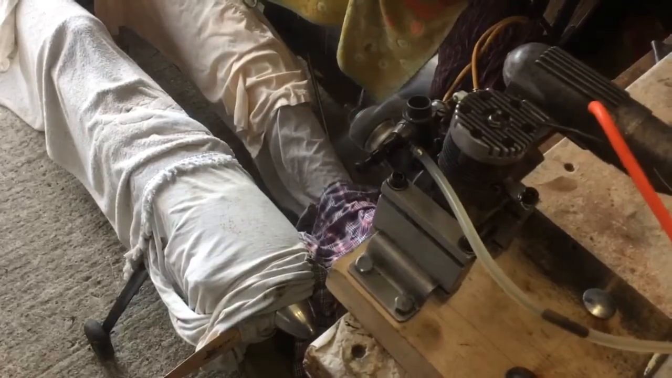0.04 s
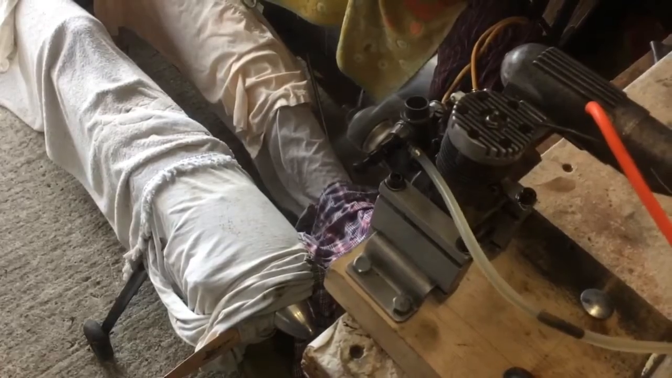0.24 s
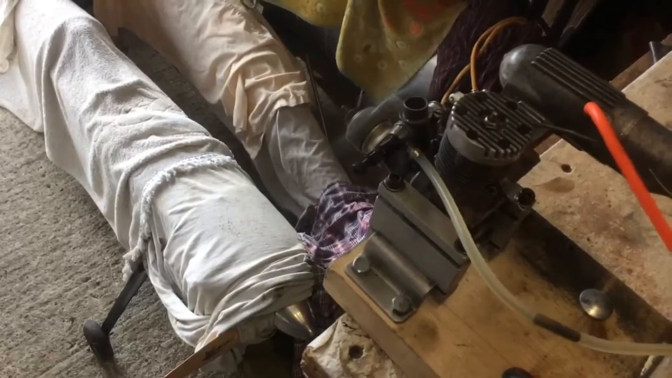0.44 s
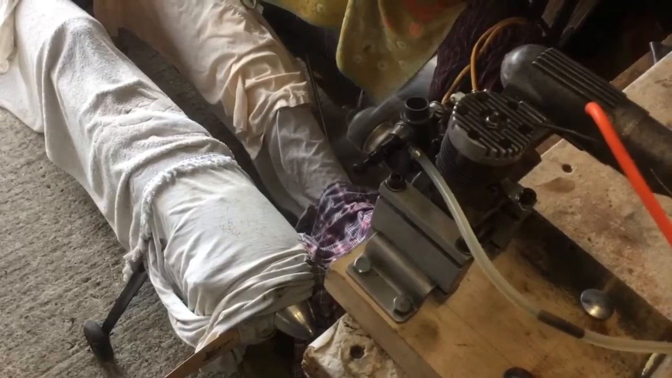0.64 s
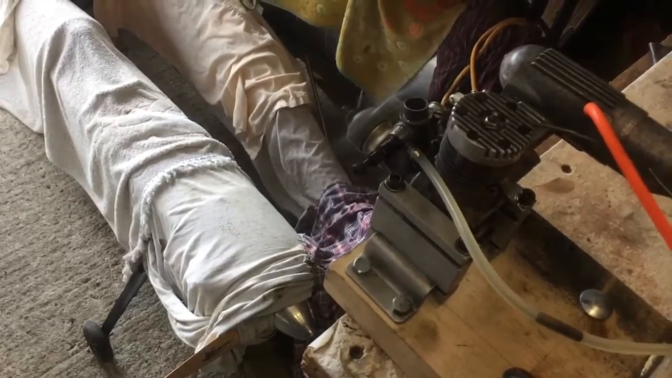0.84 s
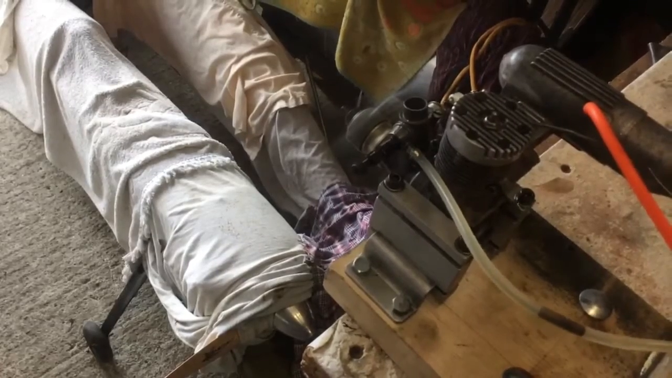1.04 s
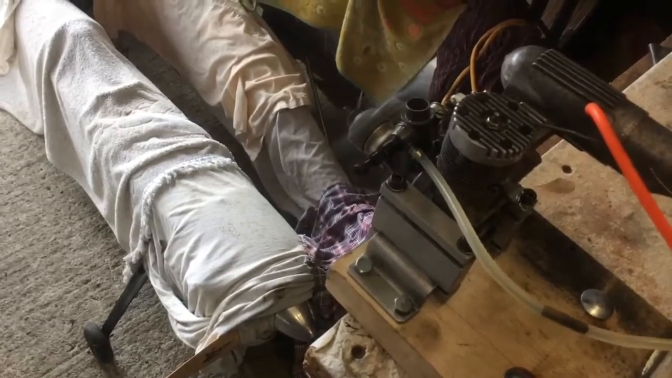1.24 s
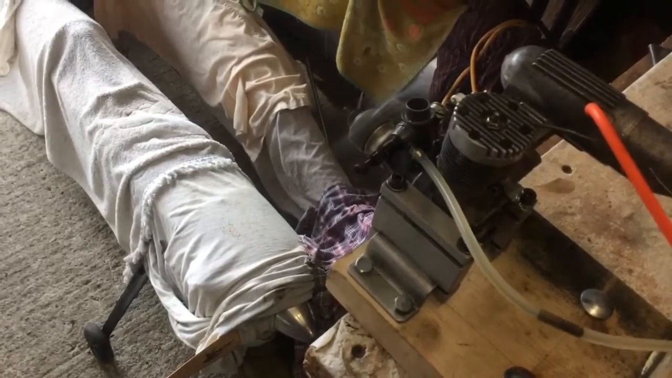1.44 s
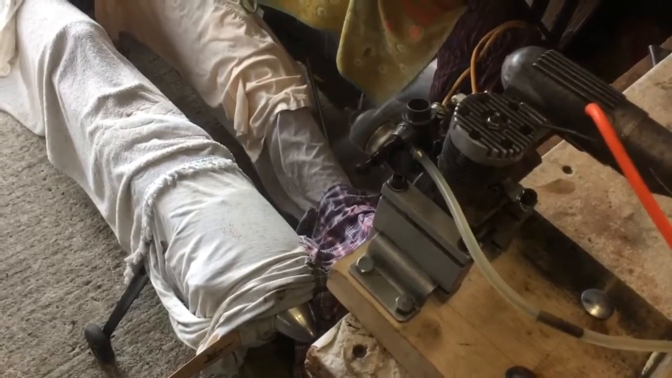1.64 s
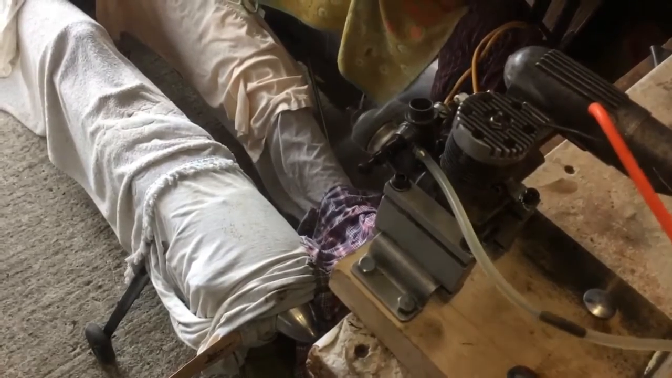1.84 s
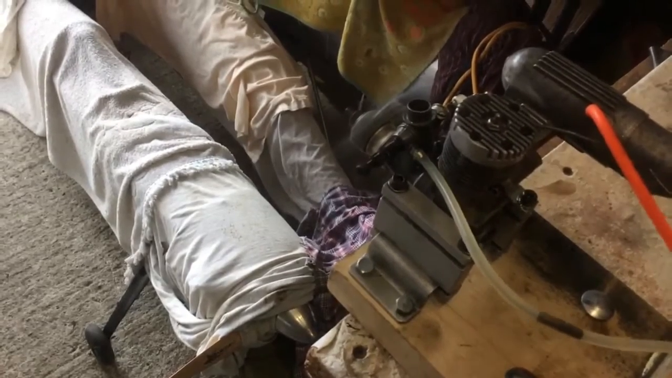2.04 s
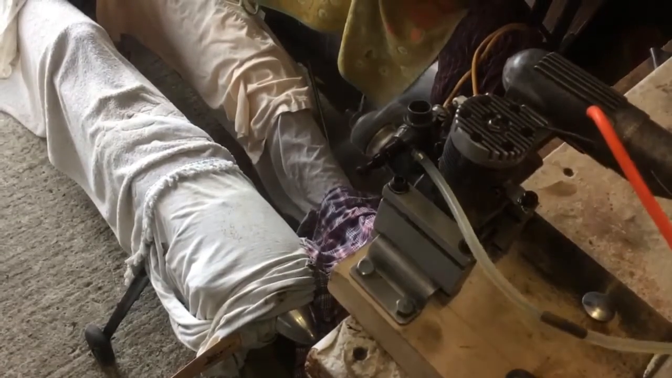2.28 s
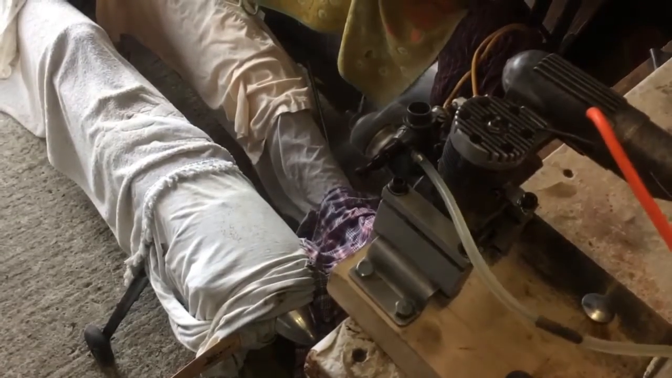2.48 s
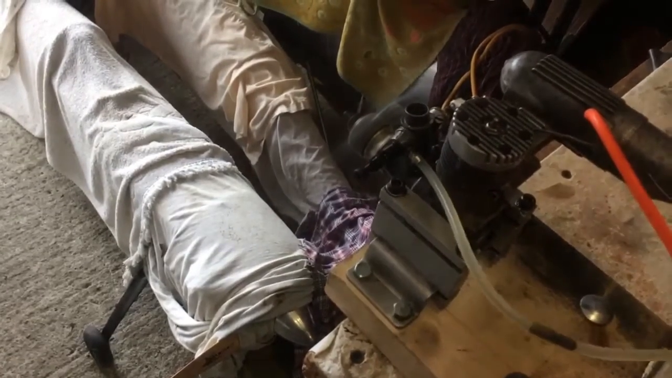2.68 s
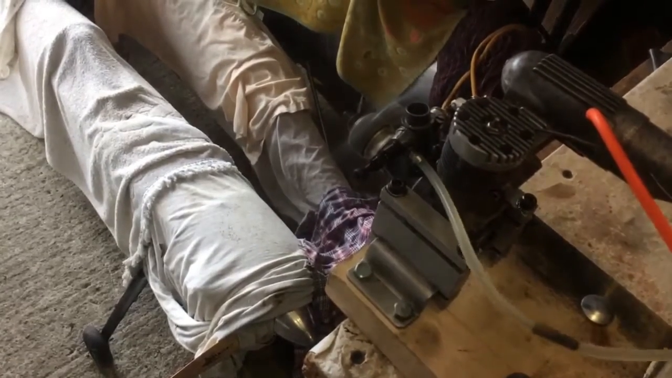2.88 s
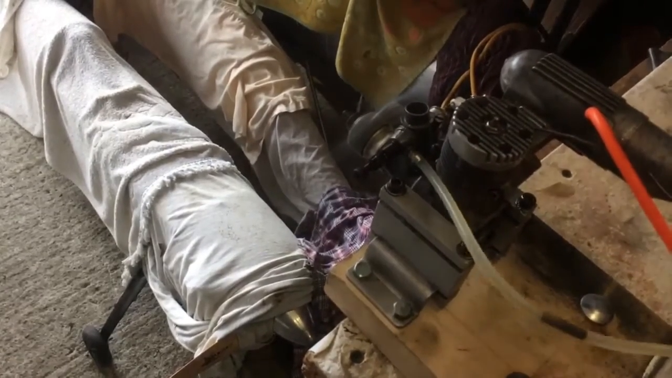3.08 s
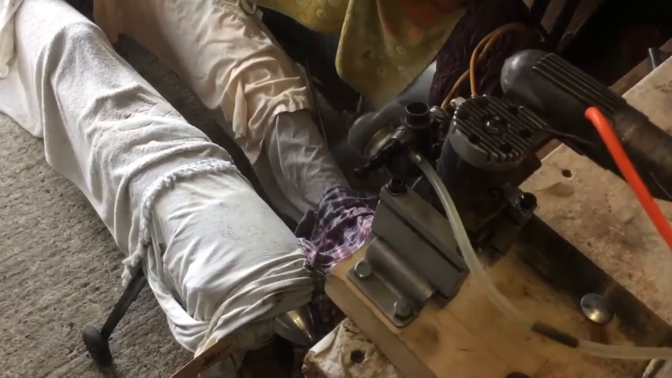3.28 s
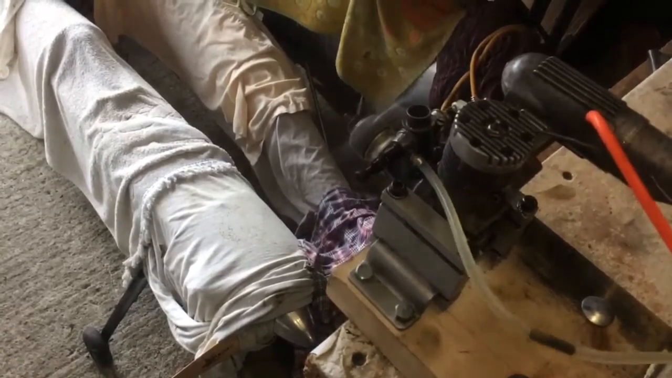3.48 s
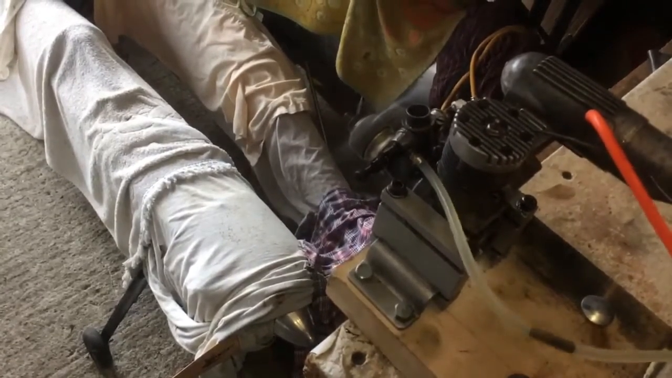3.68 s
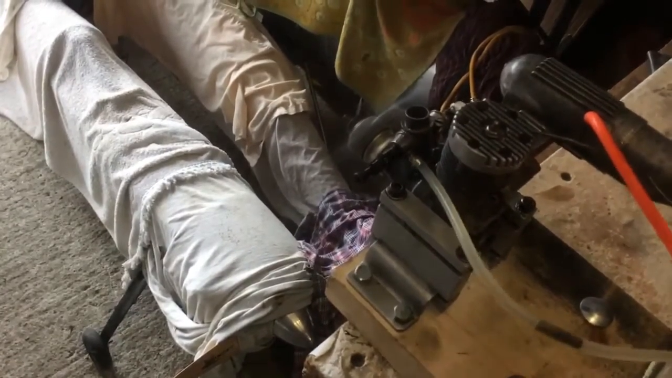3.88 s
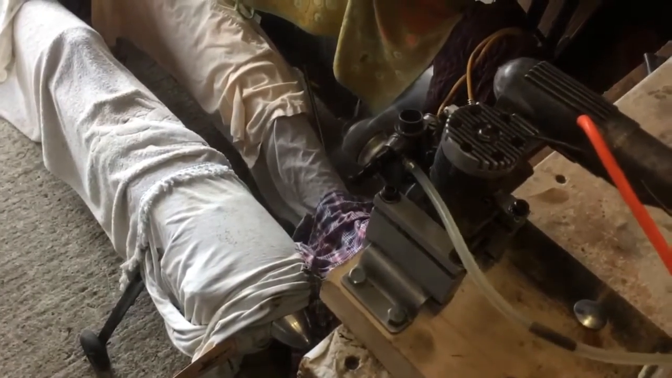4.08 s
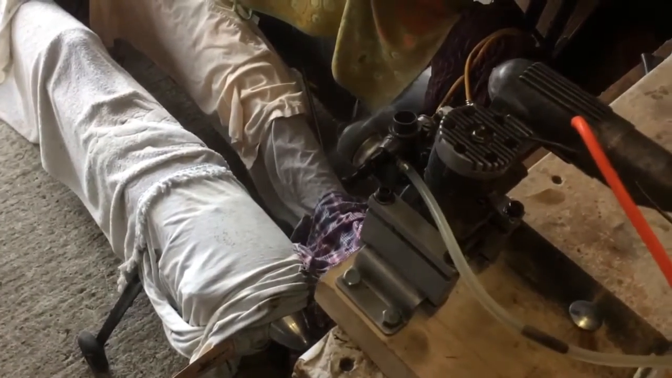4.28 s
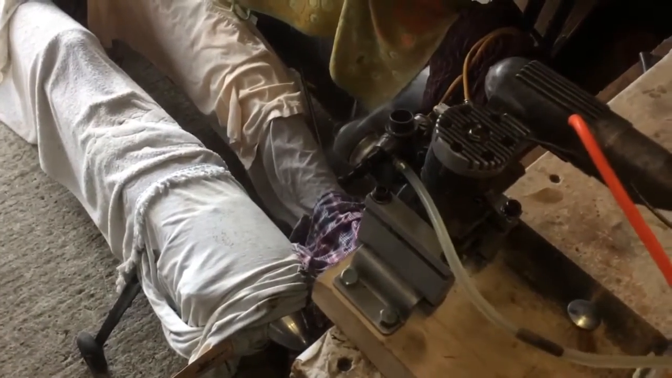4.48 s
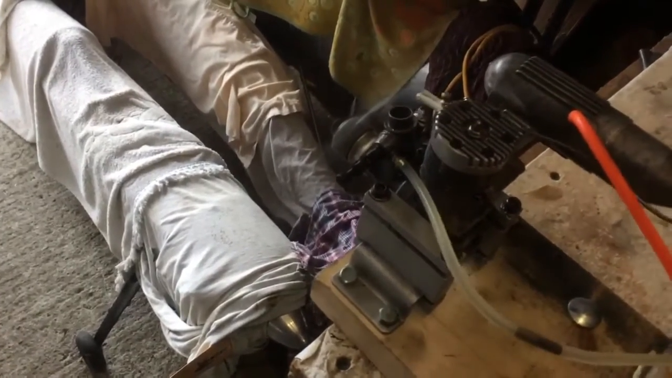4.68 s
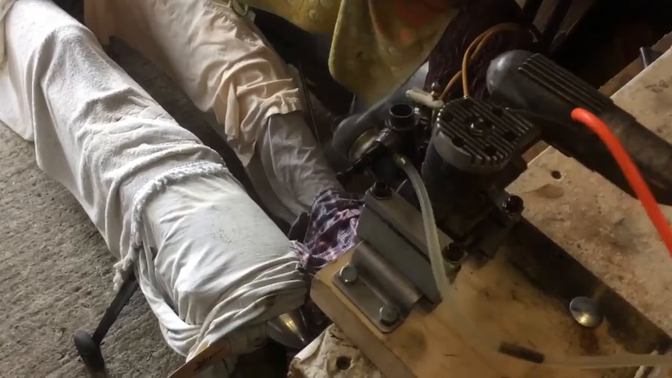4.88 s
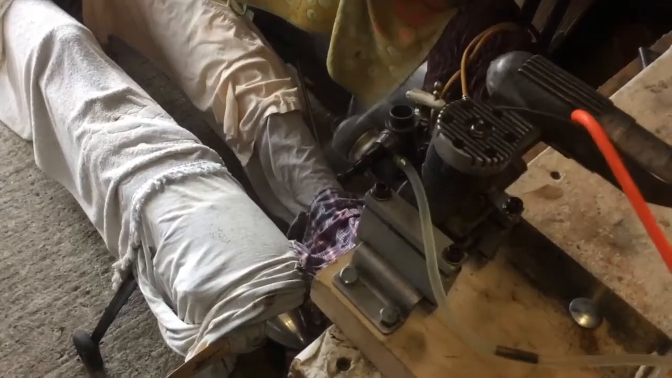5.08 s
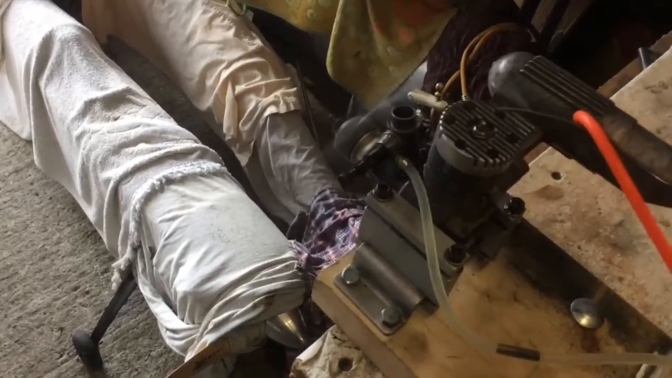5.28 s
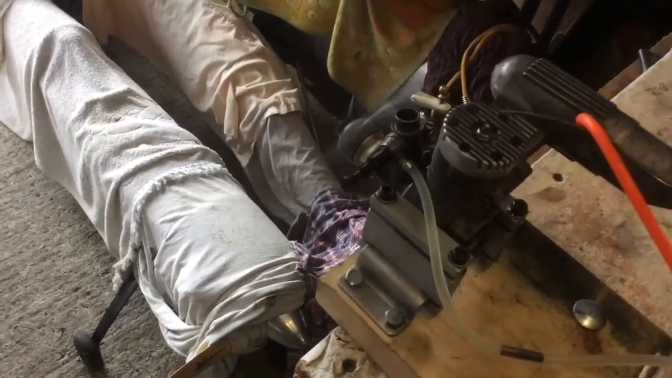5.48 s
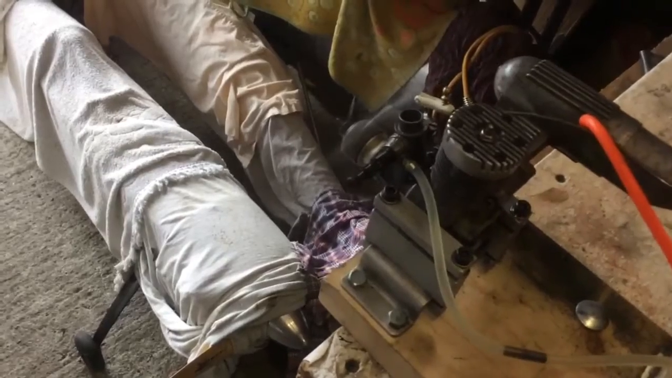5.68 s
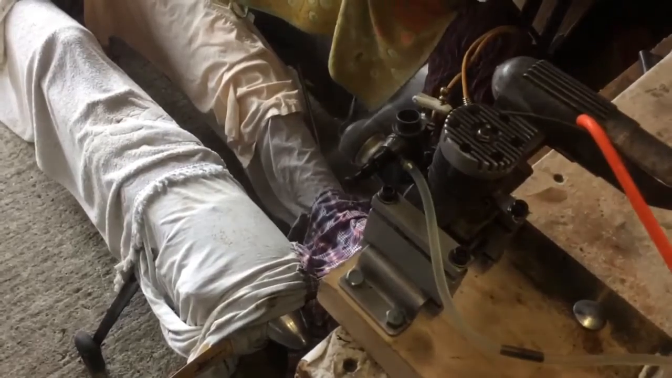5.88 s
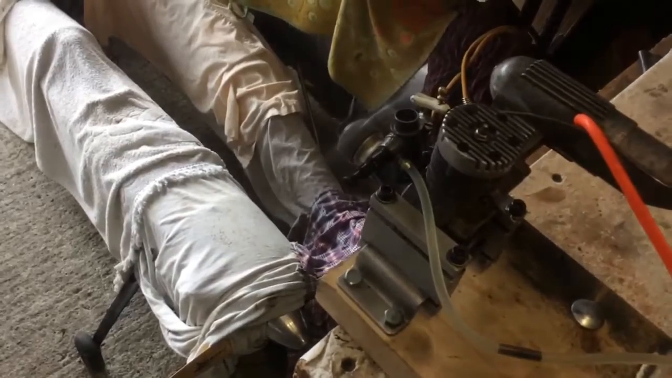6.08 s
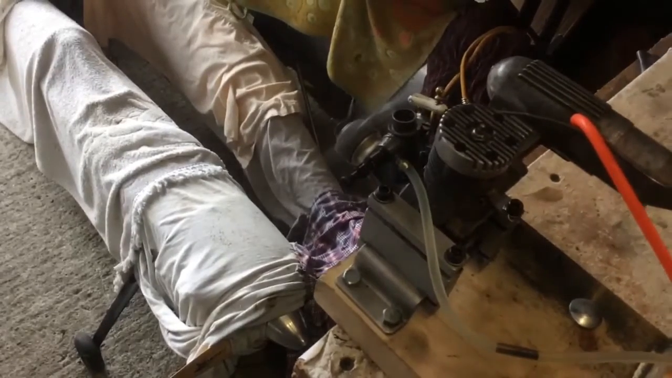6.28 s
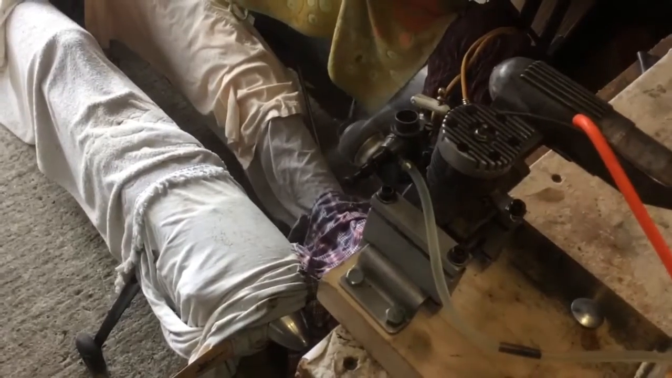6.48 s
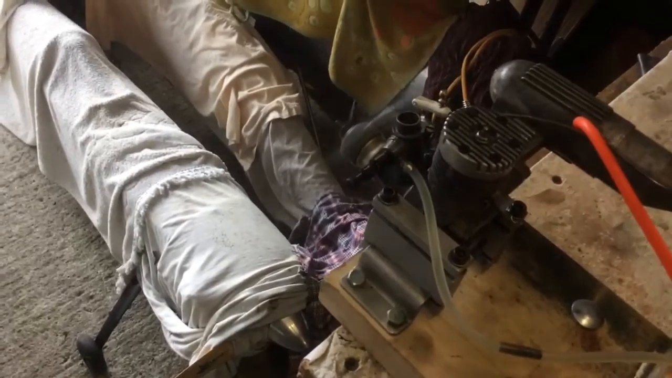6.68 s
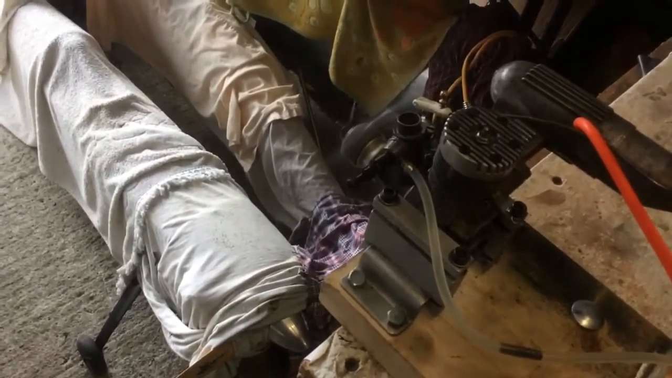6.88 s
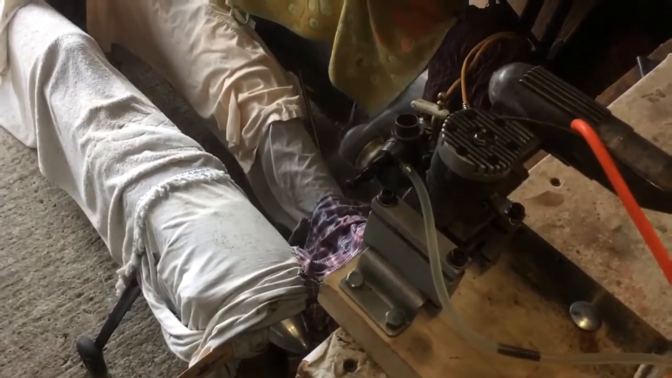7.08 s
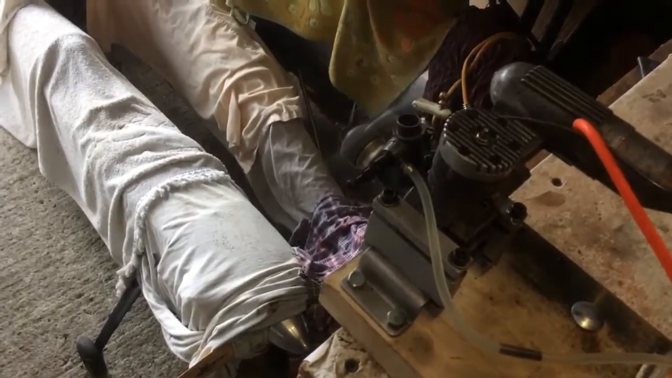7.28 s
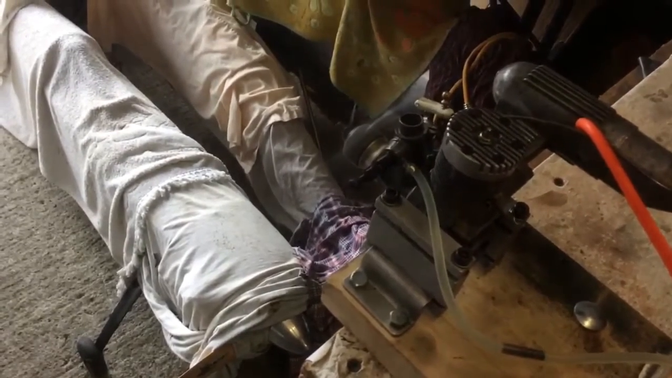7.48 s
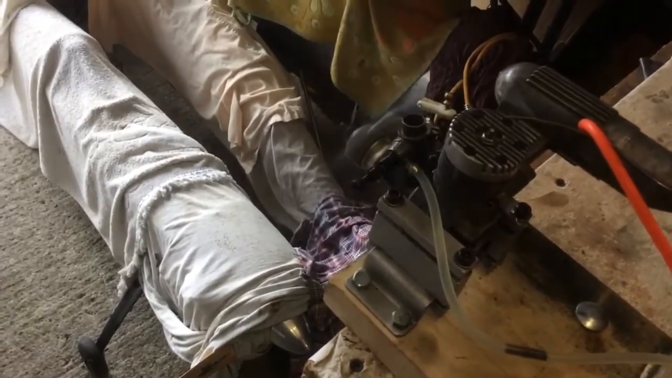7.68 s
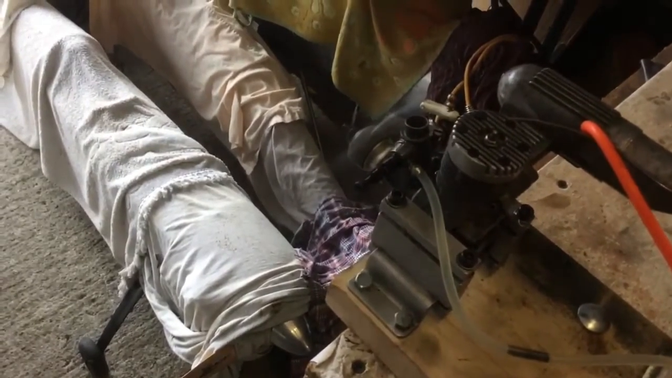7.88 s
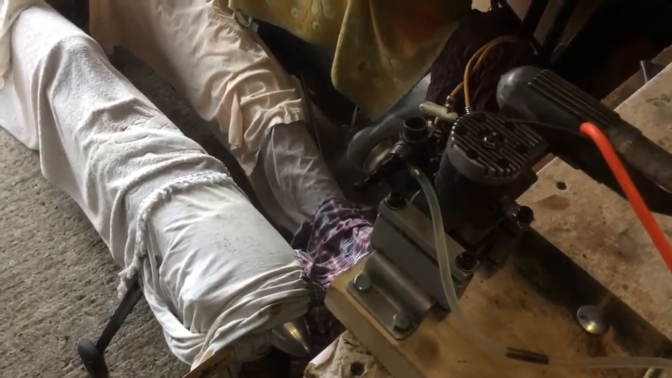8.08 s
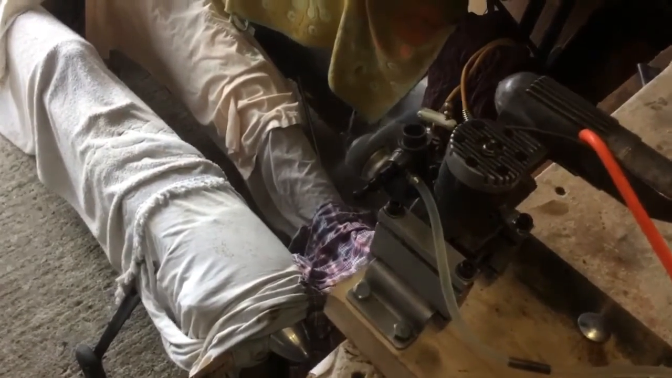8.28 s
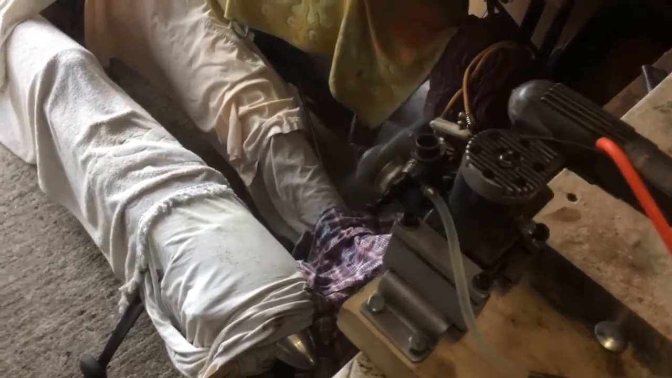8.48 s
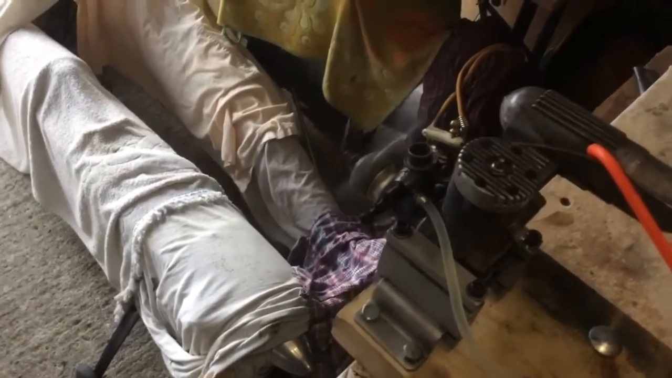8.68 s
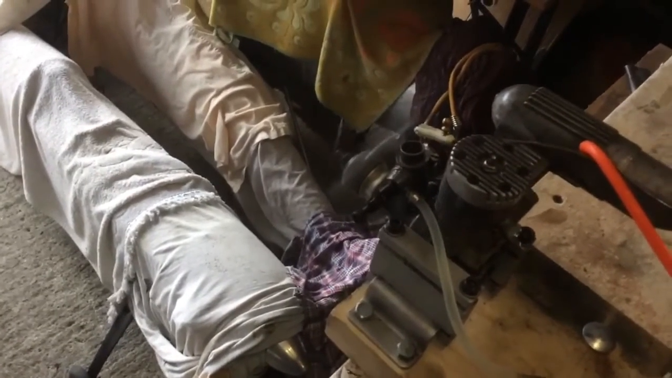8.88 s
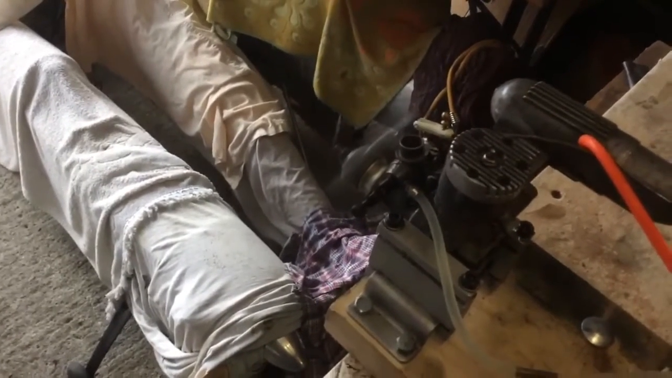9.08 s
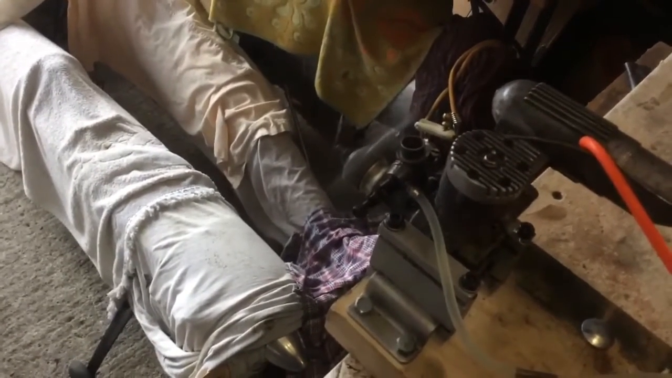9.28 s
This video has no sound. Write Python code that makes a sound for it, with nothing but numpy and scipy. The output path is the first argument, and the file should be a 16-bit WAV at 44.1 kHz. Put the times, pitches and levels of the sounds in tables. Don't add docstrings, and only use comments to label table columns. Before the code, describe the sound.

Close and dry: a tiny model engine holds a piercing, almost constant high-rev drone with a bright metallic edge and rushing exhaust. Just before the middle it is throttled down, the tone sliding quickly downward and fading. What follows is a soft low purring putter, irregular, with stumbles, occasional harder pops, small metallic ticks and spitting exhaust, continuing until the end without being revved again.

```python
import sys
import numpy as np
from scipy import signal
from scipy.fft import rfft, irfft, next_fast_len
from scipy.io import wavfile
from scipy.ndimage import uniform_filter1d, map_coordinates

SR = 44100
rng = np.random.default_rng(int(sys.argv[2]) if len(sys.argv) > 2 else 0)


def undo_db(level):
    steps = np.asarray(level, float) / 20
    return 10 ** steps


def output_pcm(signal):
    pcm = np.clip(np.atleast_2d(signal).T, -1, 1) * 32767
    wavfile.write(sys.argv[1], SR, np.round(pcm).astype(np.int16))


N = 411894

# t/s, speed/(turns per s)
SPEED = [(0.0, 192.3), (0.9, 193.0), (1.5, 192.35), (2.4, 193.3), (2.7, 192.2), (3.15, 192.45),
         (3.7, 193.65), (4.05, 192.3), (4.68, 192.6), (4.75, 188.3), (4.8, 182.3), (4.85, 170.3),
         (5.0, 109.3), (5.15, 80.5), (5.3, 68.2), (5.42, 60.5), (5.9, 56.8), (9.34, 57.2)]
# t/s, charge/(0 to 1)
BURN = [
    (4.72, 1),
    (4.795, 0.88),
    (4.83, 0.98),
    (4.87, .68),
    (4.94, 0.61),
    (5.05, 0.1),
    (5.13, 0.03),
    (5.25, 0.2),
    (5.45, .01),
]
# t/s, extra level/dB, loss of the next turn/dB
ODD_FIRINGS = [(5.304, 6, -1.5), (5.365, 4, 3), (5.413, 3.5, 0), (5.446, 4, 0), (5.513, 3.5, 0),
               (5.631, 1, 6), (5.770, 4, 3), (6.335, -2, 4), (6.514, 7, 0), (6.531, 0, 5), (6.656, 4, 2.5),
               (6.727, 4, 2), (7.012, 3.5, 0), (7.047, 4.5, 2), (7.117, 7, 7), (7.553, 7, 3),
               (7.623, 4.5, 0), (7.812, 4, 7), (8.073, 5, 5.5), (8.161, -1, 4.5), (8.230, 4, -1.5),
               (8.492, 3, 0), (8.667, 5, 3), (8.874, 8, 0), (8.926, 4.5, 0), (9.120, 4.5, 0), (9.137, 0, 3),
               (9.173, 3, 2), (9.263, 4, 6), (9.317, 8, 1.5)]
# multiple of the firing rate/1, level/dB
OPEN_ORDERS = [(1, -3), (2, 2), (3, -13.5), (4, -14), (5, -20), (6, -15), (7, -14)]
# f/Hz, level/dB
IDLE_DRONE = [(57, -5), (85, -20), (112, 0), (171, 1), (228, 0), (285, 4), (342, -5.5), (400, -12),
              (520, -25), (800, -25)]
# f/Hz, width/Hz, level/dB, lag/ms
OPEN_BARK = [(1561, 270, 5, 4.42), (1801, 320, 1.5, 4.504), (1952, 153, -4, 4.5), (2348, 290, -13.5, 0.52),
             (2744, 120, -9.5, 0.69)]
# f/Hz, width/Hz, level/dB, lag/ms
IDLE_BARK = [(736, 237, 3.5, 0.00034), (1097, 303, -0.5, 0.0048), (1526, 68, -1, 1), (1910, 73, -21, 1),
             (2085, 37, -22, 0.79), (2580, 74, -20.5, 0.033)]
# f/Hz, width/Hz, level/dB, lag/ms
THUMP = [(327, 270, 0, .5), (556, 310, -2.5, .5)]
# f/Hz, width/Hz, level/dB, lag/ms
OPEN_METAL = [(3193, 220, 0.5, 2.31), (3540, 690, -5, 1.857), (3870, 258, 7.5, 4.3), (4285, 200, -2, 1.017),
              (4768, 350, -1.5, 2.7), (5145, 560, -2.5, 2.4), (5426, 380, 1, 2.5),
              (6370, 1240, -9.5, 1.292), (7444, 416, 5.5, 3.1), (8060, 660, -7.5, 2.6),
              (8230, 510, -2, 0.647), (8890, 610, -7, 3), (9550, 660, -2.5, 3.2), (11330, 2900, -24, 6.3)]
# f/Hz, width/Hz, level/dB, lag/ms
RATTLE = [(3130, 570, -8.5, 0.018), (3650, 94, -8, 0.015), (1826, 170, -6.5, 0.023),
          (10900, 1500, -17, 0.02)]
# f/Hz, width/Hz, level/dB, lag/ms
IDLE_METAL = [(3640, 70, -4.5, 0.92), (4230, 320, -6.5, 0.463), (5140, 103, 0.5, 0.813),
              (5500, 210, -2.5, 0.607)]
# f/Hz, width/Hz, level/dB, lag/ms
IDLE_SPIT = [(6520, 180, 2, 1.5), (7280, 230, 2.5, 1.7), (8130, 230, -11, 1.5), (9200, 670, -15, 1.5),
             (6200, 1300, -15, 1.502)]
# f/Hz, level/(dB per Hz)
OPEN_GAS = [(18, -85), (30, -39.5), (135, -10.5), (187, -6.5), (325, -14), (387, -6), (450, -15),
            (578, -15.5), (1060, -19.5), (1140, -13), (1740, -35), (2080, -16.5), (6920, -48), (7460, -34),
            (12000, -50), (15600, -77), (22000, -120)]
# f/Hz, level/(dB per Hz)
IDLE_GAS = [(18, -56), (30, -29), (108, -8), (178, -8), (286, -6), (473, -6.5), (842, -11), (1320, -17.5),
            (1540, -13.5), (2300, -27), (4750, -28.5), (5250, -26), (11800, -45), (15600, -80)]
# t/s, peak level/dB
PUFFS = [
    (0.719, -32),
    (1.929, -31),
    (2.009, -19),
    (2.219, -24),
    (2.319, -22),
    (2.344, -23),
    (5.659, -33),
]
# f/Hz, share lost/(0 to 1)
LOST = [(9900, 0), (10200, .3), (10500, .05), (11600, .06), (11850, .6), (12250, .9), (12350, 1)]

PORT_LAG = 0.82


def engine():
    speed = np.interp(np.arange(N) / SR, *np.transpose(SPEED))
    drone_db, bark_db, metal_db = levels(speed)
    idle = np.clip((152 - speed) / 70, 0, 1)
    turns = crank(speed, idle)
    port = turns - PORT_LAG
    ragged = 0.04 * np.clip(slowing_of(speed), 0, None)
    even = 0.35 * rng.standard_normal(int(turns[-1]))
    pop, tick, spit = uneven_firings(port, len(even)).T

    low = exhaust_drone(turns, speed, idle)
    bark = silencer_bark(turns, port, speed, idle, even, pop, spit, ragged)
    metal = metal_ring(turns, port, speed, idle, even, tick, spit, ragged)
    gas = blend(idle, undo_db(-17.5) * hiss(OPEN_GAS), undo_db(-5) * hiss(IDLE_GAS))
    gas = patchy(gas, depth_db=1.5, top_db=-2.0) * np.std(gas)
    return undo_db(drone_db) * (low + gas) + undo_db(bark_db) * bark + undo_db(metal_db) * metal


def blend(idle, open_sound, idle_sound):
    return np.cos(idle * np.pi / 2) * open_sound + np.sin(idle * np.pi / 2) * idle_sound


def crank(speed, idle):
    t = np.arange(N) / SR
    free = np.cumsum(speed * (1 + 0.00061 * (1 - idle) * wobble(30))) / SR
    s = np.transpose(ODD_FIRINGS)[0]
    slip = np.unwrap((np.interp(s, t, free) - PORT_LAG) % 1, period=1)
    flywheel_s = 0.06
    return free - uniform_filter1d(np.interp(t, s, slip), size=int(flywheel_s * SR))


def slowing_of(speed):
    return uniform_filter1d(-np.gradient(speed) * SR, size=2000) / 100


def levels(speed):
    burn = np.clip(np.interp(np.arange(N) / SR, *np.transpose(BURN)), 0, 2)

    def between(idle_db, open_db, share):
        return idle_db + (open_db - idle_db) * share

    drone_db = between(-26, -10, burn) + 0.23 * wobble(2.01)
    bark_db = between(-24, -18, burn) - 2.5 * slowing_of(speed) + 0.44 * wobble(2.02)
    metal_db = between(-36, -16.5, burn ** 1.9) + 0.25 * wobble(2.02)
    return drone_db, bark_db, metal_db


def uneven_firings(port, count):
    uneven = 0.6 * rng.standard_normal((count, 1)) * np.ones(3)
    s, hard, miss = np.transpose(ODD_FIRINGS)
    turn = np.round(np.interp(s, np.arange(N) / SR, port)).astype(int)
    uneven[turn] += np.outer(hard, (0.21, -0.15, 1.24))
    uneven[np.minimum(turn + 1, count - 1)] -= np.outer(miss, (1.2, 1.7, 0.9))
    return uneven


def exhaust_drone(turns, speed, idle):
    hz, db = np.transpose(IDLE_DRONE)
    idle_orders = [(k, np.interp(k * speed, hz, db) - 11 * (k == 1) - 8 * (k == 3)) for k in range(1, 8)]
    open_orders = [(k, db - 14 * np.clip((165 - k * speed) / 50, 0, 1.5)) for k, db in OPEN_ORDERS]
    return blend(idle, drone(turns - 0.1, open_orders, unsteady_db=0.14, rate=20, spread=0),
                 drone(turns + 0.088, idle_orders, unsteady_db=0.8, rate=15, spread=0.1366))


def drone(turns, orders, unsteady_db, rate, spread):
    total = np.sqrt(sum(undo_db(db) ** 2 for k, db in orders) / 2)
    waves = 0
    for k, db in orders:
        wave = np.cos(2 * np.pi * (k * turns + spread * (k * k - 2.3)))
        waves = waves + undo_db(db + unsteady_db * wobble(rate)) * wave
    return waves / total


def silencer_bark(turns, port, speed, idle, even, pop, spit, ragged):
    open_bark = struck(turns, speed, even, OPEN_BARK, jitter_ms=0.0032, scatter_db=-0.5,
                       rough=0.02 + ragged, sharp=3.3, low_hz=1370, order=2)
    idle_bark = struck(port, speed, pop, IDLE_BARK, jitter_ms=0.14, scatter_db=0.5,
                       rough=0.045, sharp=2.3, low_hz=394)
    thump_db = np.where((pop < -4) | (spit > 6), 0, -60)
    thump = ringing(blows(port, thump_db, jitter_ms=0, scatter_db=-0.5), THUMP)
    return blend(idle, open_bark, -idle_bark) - undo_db(-21.0) * thump


def metal_ring(turns, port, speed, idle, even, tick_db, spit_db, ragged):
    scream = struck(turns, speed, even, OPEN_METAL, jitter_ms=0.0027, scatter_db=-0.3,
                    rough=0.055 + ragged, sharp=2.6, low_hz=2500, order=2)
    rattle = undo_db(-11.5 + 2.5 * wobble(60)) * ringing(gated(turns, 0.44, 1.5), RATTLE)
    tick = struck(port, speed, tick_db, IDLE_METAL, jitter_ms=0.152, scatter_db=0.8,
                  rough=0.15, sharp=2.2, low_hz=2500)
    spit = struck(port, speed, spit_db, IDLE_SPIT, jitter_ms=0.3, scatter_db=2.8,
                  rough=0.75, sharp=1.74, low_hz=2500)
    return blend(idle, patchy(scream + rattle, depth_db=1.08, top_db=4.0),
                 patchy(tick + undo_db(-5.5) * spit, depth_db=1.7, top_db=-0.5))


def struck(turns, speed, size_db, modes, jitter_ms, scatter_db, rough, sharp, low_hz, order=1):
    pulses = unit(blows(turns, size_db, jitter_ms, scatter_db) / np.sqrt(speed))
    sizes = undo_db(size_db[np.clip(turns, 0, len(size_db) - 1).astype(int)])
    share = np.clip(rough, 0, 1)
    drive = np.sqrt(1 - share) * pulses + np.sqrt(share) * sizes * gated(turns, 0, sharp)
    return ringing(drive, modes, order, low_hz)


def blows(turns, size_db, jitter_ms, scatter_db):
    chance = rng.standard_normal((len(size_db), 2))
    at = np.interp(np.arange(len(size_db)), turns, np.arange(N)) + chance[:, 0] * jitter_ms * SR / 1000
    taps = np.floor(at)[:, None] + np.arange(-7, 9)
    offset = taps - at[:, None]
    kernel = np.sinc(offset) * np.cos(np.pi * offset / 16) ** 2
    kernel = kernel * undo_db(size_db + scatter_db * chance[:, 1])[:, None]
    return np.bincount(np.clip(taps, 0, N).astype(int).ravel(), kernel.ravel(), N + 1)[:N]


def gated(turns, lag, sharp):
    return unit(rng.standard_normal(N) * np.exp(-sharp * ((turns - lag) % 1)))


def ringing(x, modes, order=1, low_hz=30):
    f = np.fft.rfftfreq(8192, 1 / SR)
    response = 0
    for k, (centre, width, db, lag_ms) in enumerate(modes):
        peak = 1j * f * width / (centre * centre - f * f + 1j * f * width)
        delay = np.exp(-2j * np.pi * f * lag_ms / 1000)
        response = response + (-1) ** k * undo_db(db) * peak ** order * delay
    response = response * (1j * f / (low_hz + 1j * f)) ** 2
    return unit(signal.oaconvolve(x, irfft(response))[:N])


def patchy(x, depth_db, top_db):
    hz, _, z = signal.stft(x, SR, nperseg=1024)
    field = uniform_filter1d(rng.standard_normal(z.shape), size=9, axis=0)
    field = unit(uniform_filter1d(field, size=7, axis=1))
    height = np.clip((hz[:, None] - 8500) / 2000, 0.25, 1)
    sink = top_db * height * np.clip(-field, 0, 3) ** 2
    return unit(signal.istft(z * undo_db(depth_db * field - sink), SR, nperseg=1024)[1][:N])


def hiss(spectrum):
    f, db = np.transpose(spectrum)
    return unit(filtered(rng.standard_normal(N), lambda hz: undo_db(np.interp(np.log(hz + 1), np.log(f), db))))


def filtered(x, response):
    m = next_fast_len(N + SR // 2)
    return irfft(rfft(x, m) * response(np.fft.rfftfreq(m, 1 / SR)), m)[..., :N]


def wobble(rate):
    coarse = np.arange(0, N + 64, 64)
    knots = rng.standard_normal(int(N * rate / SR) + 4)
    return np.interp(np.arange(N), coarse, map_coordinates(knots, [coarse * rate / SR]))


def unit(x):
    return x / np.sqrt(np.mean(x ** 2) + 1e-20)


def puffs():
    push, t = np.zeros(N + SR), np.arange(-900, 900) / SR
    shape = np.exp(-(t / 0.0041) ** 2) * np.cos(2 * np.pi * 80 * t)
    for s, db in PUFFS:
        push[round(s * SR) - 720:][:len(t)] += undo_db(db) * shape
    return push[:N]


def walls(x):
    t = np.arange(SR // 4) / SR
    tail = rng.standard_normal(len(t)) * undo_db(-60 * t / 0.083) * (t > 0.004)
    return signal.fftconvolve(x, tail / np.linalg.norm(tail))[:N]


def scene():
    motor = engine()
    return (motor + undo_db(-26) * walls(motor) + puffs())[None]


def holes(x):
    hz, _, z = signal.stft(x, SR, nperseg=1024)
    draw = rng.random((len(hz) // 5 + 1, z.shape[-1] // 4 + 1))
    draw = draw.repeat(5, 0).repeat(4, 1)[:len(hz), :z.shape[-1]]
    kept = draw > np.interp(hz, *np.transpose(LOST))[:, None]
    return signal.istft(z * kept, SR, nperseg=1024)[1][..., :N]


def low_pass(x):
    return signal.sosfilt(signal.butter(12, 12160, fs=SR, output="sos"), x)


def record(dry):
    clipped = dry / (1 + np.abs(dry / 1.05) ** 6) ** (1 / 6)
    return low_pass(holes(clipped))


dry = scene()
out = record(dry)
output_pcm(out)
```